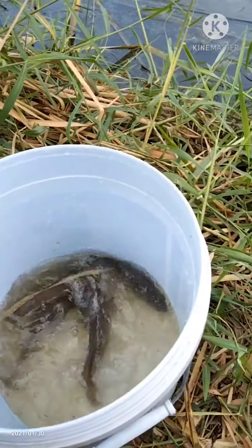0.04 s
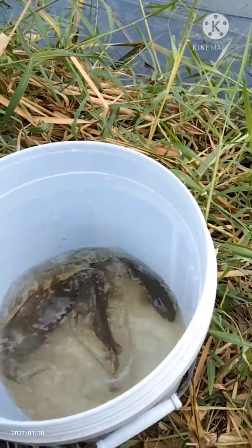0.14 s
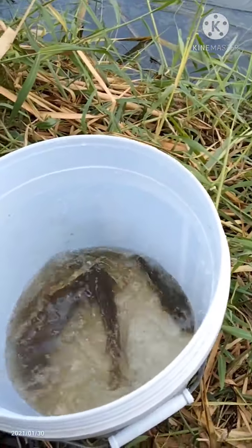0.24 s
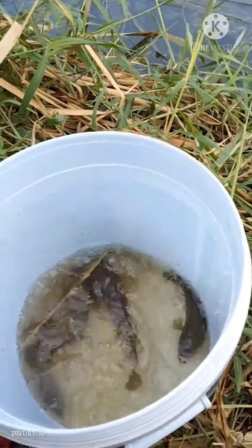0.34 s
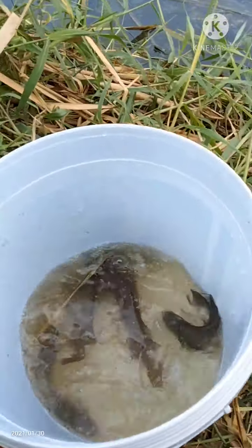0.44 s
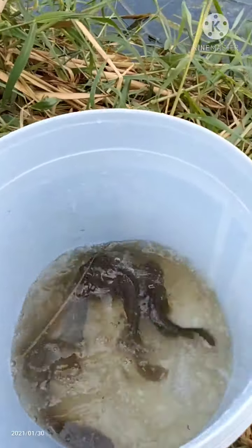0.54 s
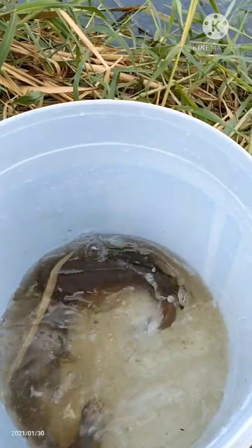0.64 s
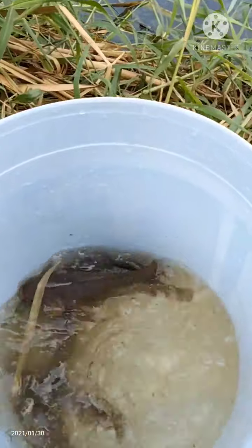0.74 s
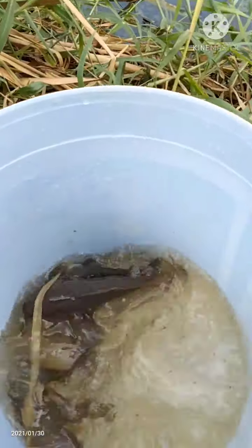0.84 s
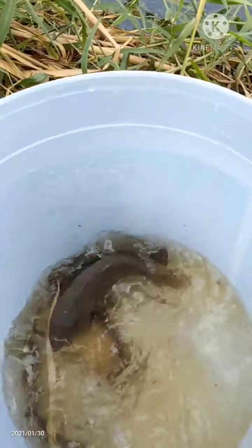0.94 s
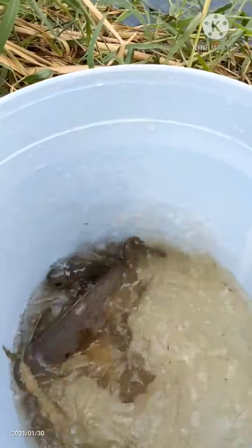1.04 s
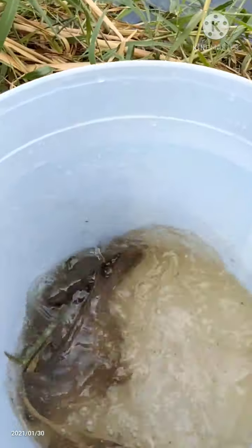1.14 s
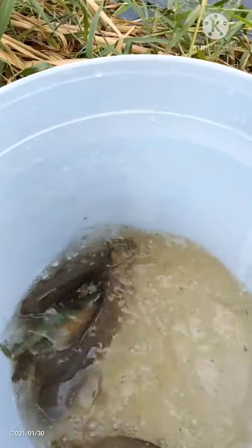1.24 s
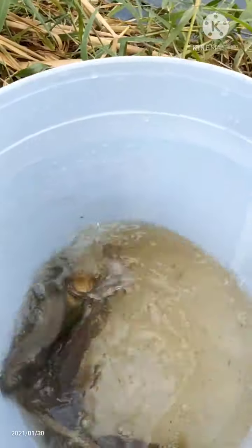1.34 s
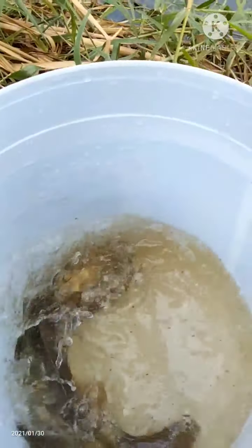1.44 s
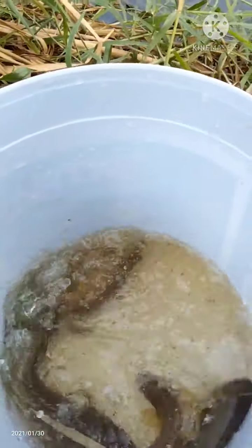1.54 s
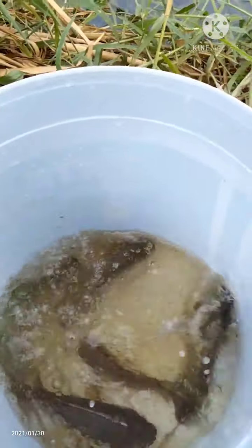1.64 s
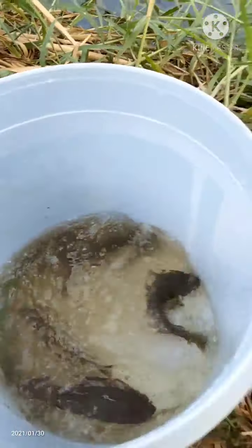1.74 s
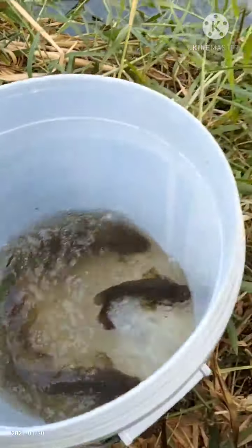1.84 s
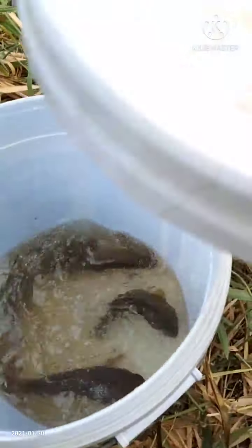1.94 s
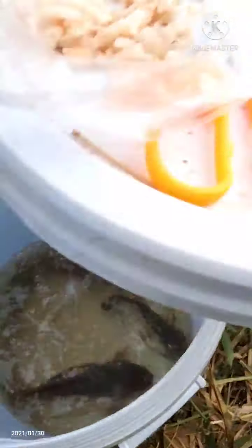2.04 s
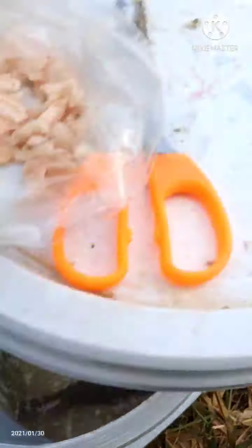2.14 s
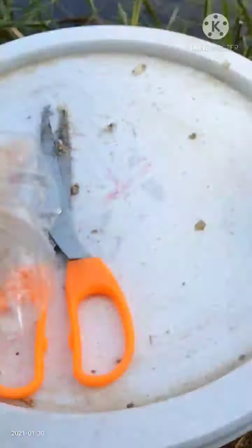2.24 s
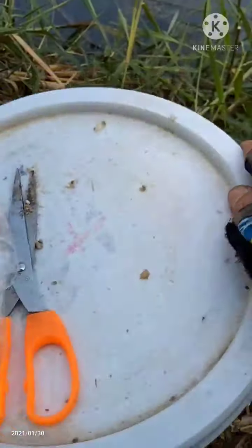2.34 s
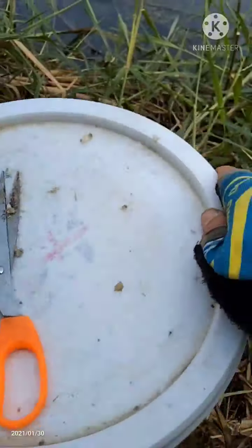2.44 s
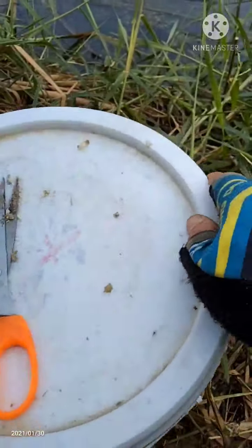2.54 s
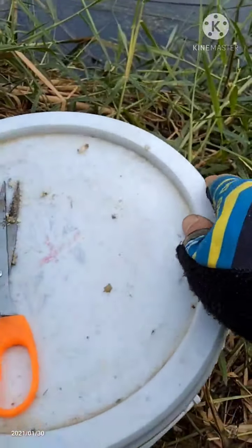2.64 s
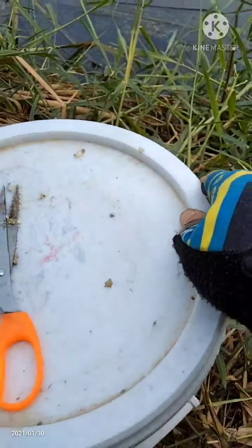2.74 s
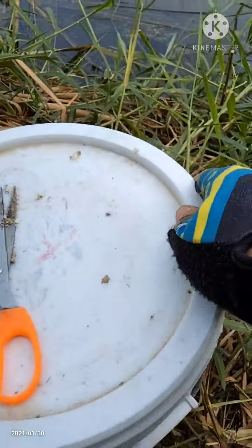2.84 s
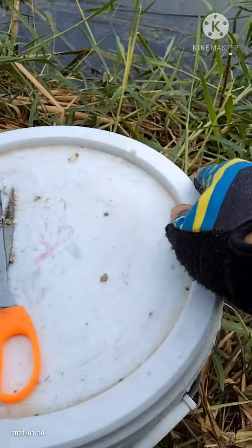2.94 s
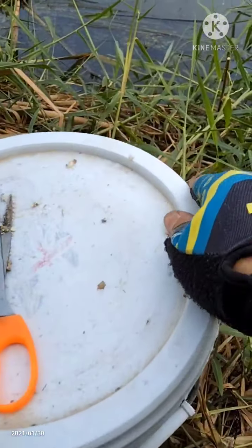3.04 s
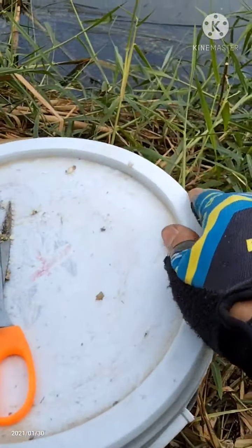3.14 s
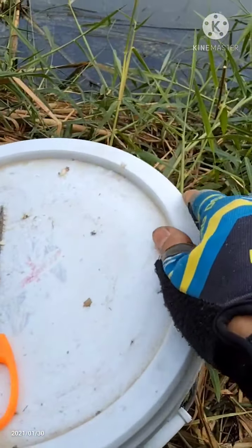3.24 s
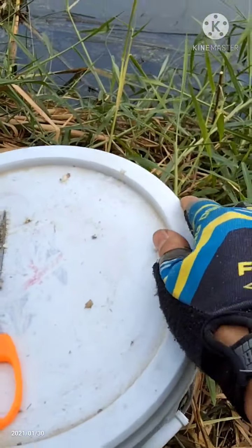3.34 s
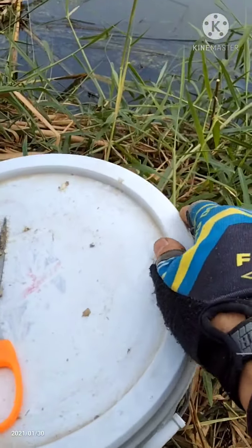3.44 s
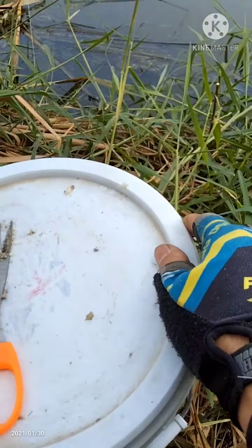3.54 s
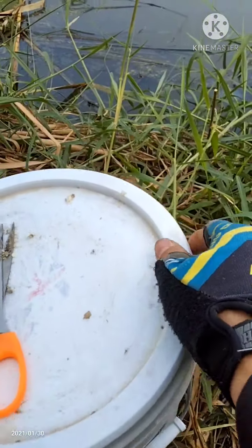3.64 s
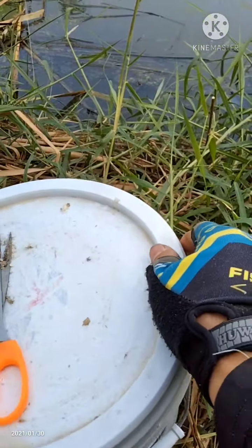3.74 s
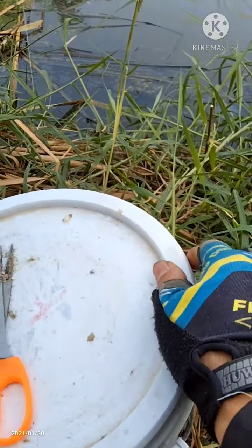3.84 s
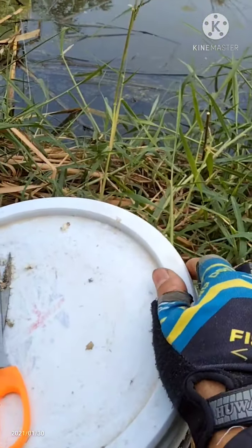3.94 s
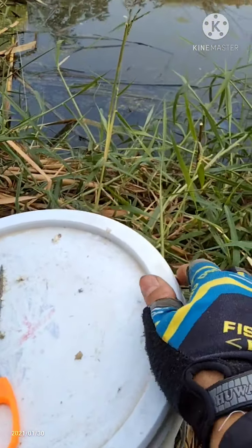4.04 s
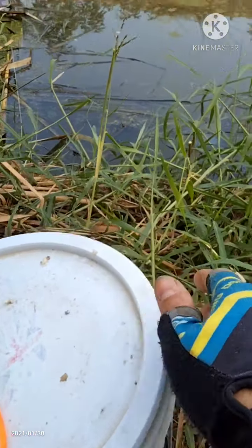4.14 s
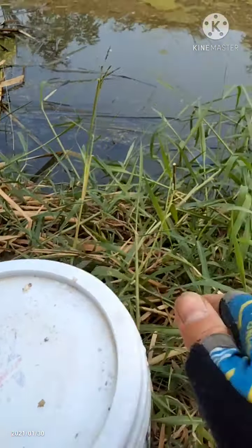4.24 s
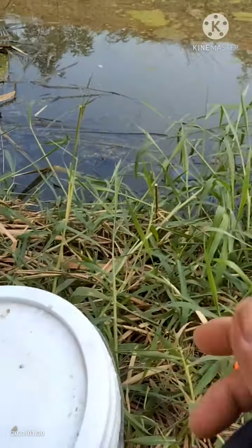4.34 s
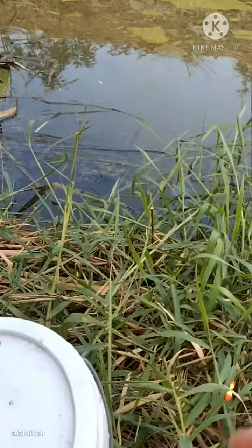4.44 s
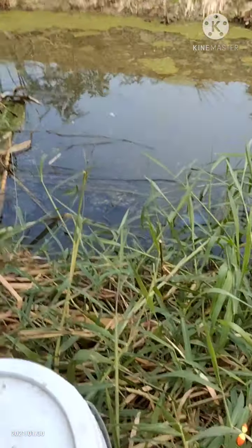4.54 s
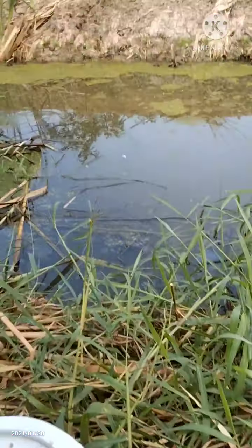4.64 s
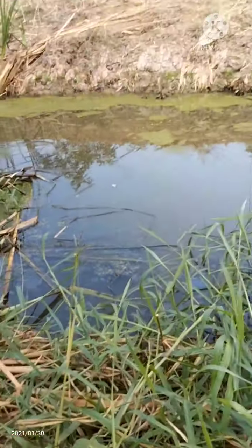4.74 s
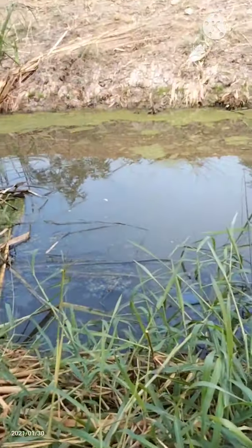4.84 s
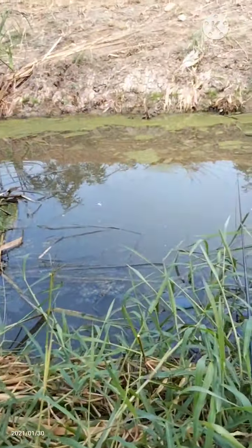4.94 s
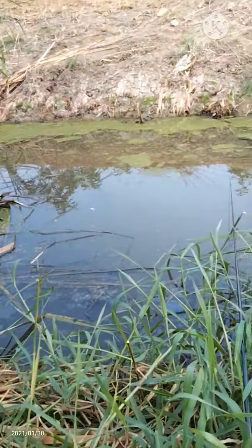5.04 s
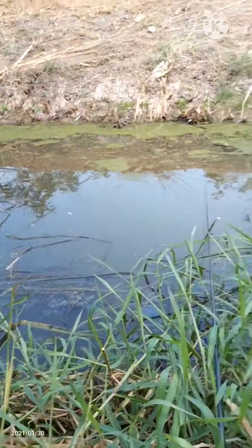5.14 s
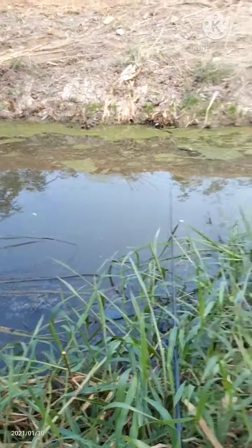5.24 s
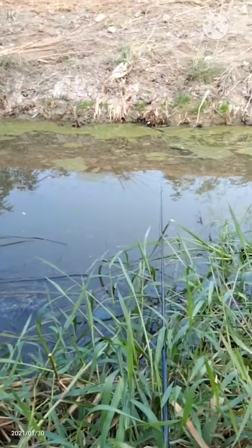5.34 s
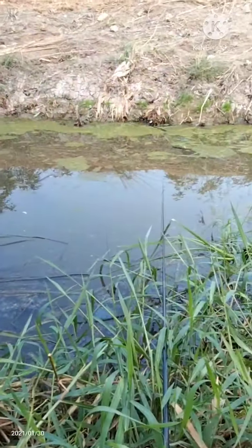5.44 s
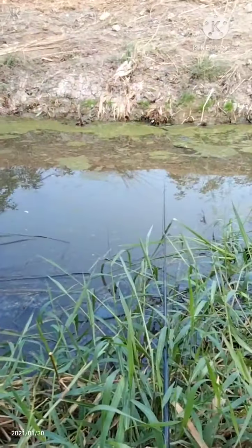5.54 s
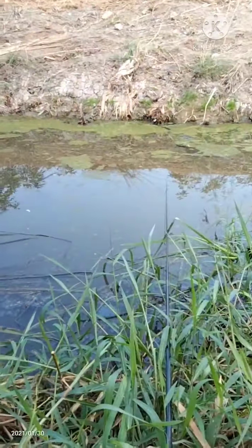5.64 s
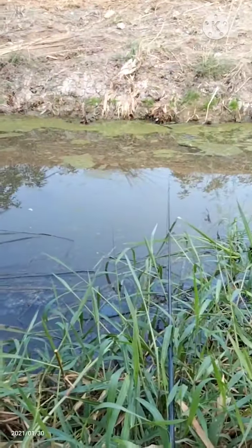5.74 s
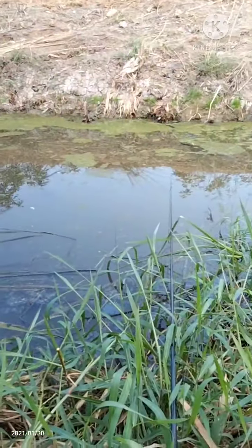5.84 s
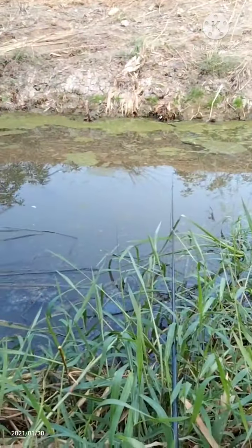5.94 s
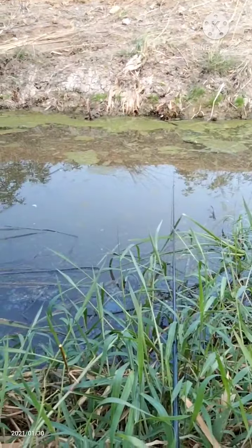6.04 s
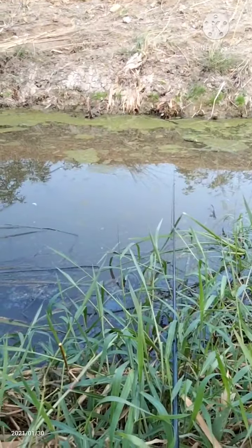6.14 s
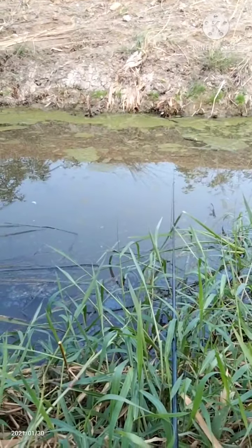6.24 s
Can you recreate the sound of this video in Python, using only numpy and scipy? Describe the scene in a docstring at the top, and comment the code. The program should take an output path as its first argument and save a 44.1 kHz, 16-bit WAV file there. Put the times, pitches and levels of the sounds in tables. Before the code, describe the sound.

A close outdoor stereo scene. From 0 s, gritty, bright cloth rustle sits near the right side over faint lapping, with light splashes at 0.2 and 0.4 s. At 0.6 s a hard wet tail slap cracks out, followed by bubbly plops and droplets to about 0.8 s; small crisp ticks and weaker splashes follow around 1.0 to 1.2 s. A denser flurry of slaps, sloshing and gurgling fills 1.33 to 1.6 s, the open plastic bucket resonating hollowly, then subsides. At 2.4 to 2.6 s a plastic lid lands in loud, low clattering knocks with rim rattle and scraping. Softer thumps and pushes continue from 2.7 to 3.9 s, strongest near 3.65. A firm cloth rub and grass swishes come around 4.7 to 5.2 s, with a dull tap at 5.24. Rustling fades to sparse ticks, faint drips, light breeze and slightly rising distant murmur by 6.3 s.

```python
"""Cloth rustles close to the right port as small fish thrash in shallow water in a plastic bucket outdoors.
A lid then drops on, knocks, scrapes and is pressed home by a hand; ticks, grass and a far murmur go on.
Water is damped bubble sines and clumpy noise; the bucket and the lid are resonances driven by noise and blows.
Cloth, grass and air are shaped noise; two ports listen, and the right one rings in the treble."""
import sys
import numpy as np
from scipy import signal
from scipy.fft import rfft, irfft, next_fast_len
from scipy.io import wavfile
from scipy.ndimage import uniform_filter1d, map_coordinates

SR = 44100
rng = np.random.default_rng(int(sys.argv[2]) if len(sys.argv) > 2 else 0)


def dump(signal):
    """Clip the signal to [-1, 1] and save it as 16-bit WAV at the path in sys.argv[1]."""
    limited = np.clip(np.atleast_2d(signal).T, -1, 1)
    pcm = np.round(limited * 32767).astype(np.int16)
    wavfile.write(sys.argv[1], SR, pcm)


N = 277384
COVERED_S = 2  # the open water's bubbles and faint lapping last until here


def amp(db):
    """Decibels to gain."""
    return 10 ** (np.asarray(db) / 20)


def unit(x):
    """Scaled to rms 1."""
    return x / np.sqrt(np.mean(x ** 2) + 1e-20)


def gains(rows):
    """One gain per sample for each dB column, silent outside the table."""
    s, *columns = np.transpose(rows)
    t = np.arange(N) / SR
    inside = abs(t - np.clip(t, s[0], s[-1])) < .02
    return [amp(np.interp(t, s, column)) * inside for column in columns]


def wobble(rate_hz):
    """Smooth random curve with rate_hz knots a second."""
    knots = rng.standard_normal(int(N * rate_hz / SR) + 4)
    return map_coordinates(knots, [np.arange(N) * rate_hz / SR])


def filtered(x, response):
    """x times a complex response of frequency."""
    m = next_fast_len(N + SR // 2)
    return irfft(rfft(x, m) * response(np.fft.rfftfreq(m, 1 / SR)), m)[..., :N]


def low_cut(corner_hz):
    """Second-order high-pass response: small sources radiate no deep bass."""
    return lambda hz: (1j * hz / (corner_hz + 1j * hz)) ** 2


def points(table):
    """Gain of (Hz, dB) points joined on a log axis."""
    point_hz, db = np.transpose(table)
    return lambda hz: amp(np.interp(np.log(hz + 1), np.log(point_hz), db))


def modes(table):
    """Causal sum of (Hz, width Hz, dB) resonances of alternating sign."""
    def response(f):
        total = 0
        for k, (center, width, db) in enumerate(table):
            total = total + (-1) ** k * amp(db) * 1j * f * width / (center * center - f * f + 1j * f * width)
        return total
    return response


def noise(response, alike_hz, patchy_db=0):
    """Patchy stereo noise of rms 1, shared by the ports well below alike_hz and unrelated well above."""
    z = signal.stft(rng.standard_normal((2, N)), nperseg=256)[2]
    field = uniform_filter1d(rng.standard_normal(z.shape[1:]), size=4, axis=0)
    field = uniform_filter1d(field, size=7, axis=1)
    pair = signal.istft(z * amp(patchy_db * unit(field)), nperseg=256)[1][:, :N]

    def mid_side(hz):
        turn = np.arccos(1 / (1 + (hz / alike_hz) ** 2)) / 2
        return response(hz) * [np.cos(turn), np.sin(turn)]
    mid, side = filtered(pair, mid_side)
    return unit(np.array([mid + side, mid - side]))


def bubbles(s, hz, t60_s, db, pan_db, rise, order=1):
    """Damped sines of rising pitch, held longer at higher order; each has its own level and lag per port."""
    t = np.arange(2200) / SR
    u = t / t60_s[:, None]
    swell = 1 - np.exp(-t * hz[:, None] / 1.6)  # the neck closes over a cycle or two
    tone = np.sin(2 * np.pi * hz[:, None] * t * (1 + rise * u))
    wave = amp(db[:, None] - 60 * u ** order) * swell * tone
    lag = rng.integers(-14, 14, len(s))  # samples between the ports
    pad = 20  # samples of room for early arrivals
    ports = []
    for side in (1, -1):
        first = np.round(s * SR).astype(int)[:, None] + pad + side * lag[:, None] // 2
        at = first + np.arange(len(t))
        heard = wave * amp(side * pan_db[:, None] / 2)
        ports.append(np.bincount(at.ravel(), heard.ravel(), N + SR)[pad:N + pad])
    return np.array(ports)


def bursts(s, db, pan_db, t60_s, attack_s):
    """Stereo envelope of sudden rises that die away; positive pan is left."""
    env, t = np.zeros((2, N + SR)), np.arange(SR // 5) / SR
    for at, level, pan, life in zip(s, db, pan_db, t60_s):
        shape = amp(level - 60 * t / max(life, .002)) * (1 - np.exp(-t / attack_s))
        env[:, round(at * SR):][:, :len(t)] += amp([[pan / 2], [-pan / 2]]) * shape
    return env[:, :N]


def gestures(s, length_s, db, rise_db_per_s, fall_db_per_s):
    """Gain of movements that swell to their level, hold it and fade, at steady dB a second."""
    t = np.arange(0, N + 64, 64) / SR
    early = np.maximum(s[:, None] - t, 0)
    late = np.maximum(t - (s + np.abs(length_s))[:, None], 0)
    each = amp(db[:, None] - abs(rise_db_per_s) * early - abs(fall_db_per_s) * late)
    return np.interp(np.arange(N) / SR, t, np.sqrt((each ** 2).sum(axis=0)))


def fish():
    """Churning bouts and tail slaps, each with an air pocket and droplets; the bucket's air answers."""
    # Tail slaps: start_s, level_db, bubble_hz, pan_db (+ left), bubble_rel_db
    slaps = [(0.218, -30, 2000, -8, -10), (0.377, -19, 1830, 4, -10), (0.608, -5, 2510, 4.5, -14),
             (0.618, -23, 1466, -2, 2), (0.632, -40, 1340, 7, 12), (0.706, -19, 2450, -5, -7),
             (0.735, -15, 1990, -1.5, 0), (0.77, -33, 890, -0.5, 8), (1.028, -24.5, 1120, 1.5, -12),
             (1.047, -37.5, 1340, 0, 14.5), (1.16, -22, 1540, -12.5, -6), (1.352, -13, 1670, 0, -9),
             (1.366, -12, 947, 12.5, -8.5), (1.383, -16.5, 553, 14, -17), (1.421, -9.5, 1790, 9, -2),
             (1.46, -9.5, 1415, 1, -5.5), (1.486, -37, 2700, -15, 13), (1.521, -16, 1870, 1, -5),
             (1.587, -38, 1380, -10, 4), (1.636, -33.5, 920, -3, 9), (1.765, -26.5, 2400, -11, -6),
             (1.794, -44, 838, 1, 5), (1.941, -27.5, 2740, -5.5, 0)]
    # Thrashing bouts: start_s, length_s, slosh_db, boom_db
    bouts = [(0.089, 0.08, -47.5, -51.5), (0.542, 0.05, -40, -58), (0.597, 0.018, -35, -45),
             (0.671, 0.035, -32.5, -57.5), (0.737, 0.045, -38.5, -39), (0.867, 0.27, -46.5, -60),
             (1.327, 0.0057, -41.5, -43), (1.376, 0.11, -23.5, -48), (1.518, 0.012, -26.5, -47),
             (1.583, 0.071, -40, -61), (1.745, 0.092, -40, -49.5)]
    # Air in the open bucket: center_hz, width_hz, level_db
    open_bucket = [(329, 23.6, -1.5), (171.4, 13.6, -8.5)]
    drops_count, drop_within_s, drop_cycles, drop_db = 10, 0.037, 29, -7  # cycles to fade 60 dB
    drop_spread, drop_below = 2.5, 0.285  # highest/lowest pitch; log share below the pocket's pitch
    wall_db = 26  # how hard a slap jolts the bucket's air
    still_db = -73.5

    start, length, slosh_db, boom_db = np.transpose(bouts)
    lapping = amp(still_db) * (np.arange(N) < COVERED_S * SR)
    slosh = gestures(start, length, slosh_db, rise_db_per_s=900, fall_db_per_s=187) + lapping
    boom = gestures(start, length, boom_db, rise_db_per_s=2498, fall_db_per_s=300) + lapping
    air = unit(amp(4.5 * wobble(30)) * noise(modes(open_bucket), alike_hz=712))

    s, db, hz, pan, bubble_db = np.transpose(slaps)
    surge = amp(2.7 * wobble(70)) * slosh
    surge = surge + bursts(s, db - 5.5, pan, 0.058 + 0 * s, attack_s=0.0022)
    pocket = bubbles(s + 0.00184, hz, 40 / hz, db + bubble_db - 3.5, pan, rise=0.034, order=2)
    pocket *= amp(1.8 * wobble(150))  # the surface around the pocket keeps moving

    late, spread = rng.random((len(s), drops_count, 2)).T
    drop_s = (s + drop_within_s * late).ravel()
    drop_hz = (hz * drop_spread ** (spread - drop_below)).ravel()
    drop_level_db = (db + drop_db - 20 * late).ravel()  # later droplets are weaker
    drop_pan_db = np.tile(pan, drops_count)
    drops = bubbles(drop_s, drop_hz, drop_cycles / drop_hz, drop_level_db, drop_pan_db, rise=0.16)

    blows = np.bincount(np.round(s * SR).astype(int), amp(db + wall_db), N)
    jolts = filtered(blows, modes(open_bucket))
    whole = surge * water() + pocket + drops + jolts + amp([[1.5], [-1.5]]) * boom * air
    return filtered(whole, low_cut(120))


def water(count=2600):
    """Grain of broken water: a cloud of small bubbles, a few of them strong, over clumpy noise."""
    # Splash spectrum: freq_hz, density_db (relative, per Hz)
    splash = [(300, -11.5), (600, -6), (900, -22.5), (1900, -1), (3300, -0.5), (5500, -12.5), (9000, -12.5),
              (15000, -15)]
    cloud_db, spread_db = -9, 12  # spread: pan range from far right to far left
    when, pitch, life, size, side = rng.random((count, 5)).T
    hz = 700 * 8 ** pitch
    size_db = -3 * np.log(1 - size)
    level_db = size_db - 11 * abs(pitch - .45)
    cloud = bubbles(when * COVERED_S, hz, (14 + 40 * life) / hz, level_db, spread_db * (side - .5), rise=0.17)
    cloud /= np.sqrt(np.mean(cloud[:, :round(COVERED_S * SR)] ** 2))
    wash = unit(amp(2.1 * wobble(250)) * noise(points(splash), alike_hz=899, patchy_db=5.5))
    return amp(cloud_db) * cloud + amp([[-6.5], [-11.5]]) * wash


def plops():
    """Lone bubbles and drips ring as damped sines; a few chirp steeply upward on reaching the surface."""
    # Lone bubbles: start_s, level_db, pitch_hz
    lone = [(0.667, -31.5, 4030), (0.684, -28.5, 3010), (0.732, -28, 2840), (0.742, -31, 1630),
            (0.887, -37.5, 1440), (0.978, -43, 1080), (1.137, -40, 1165), (2.139, -44, 3140),
            (2.798, -40, 1920), (2.803, -38.5, 2190), (2.866, -41.5, 1460), (6.145, -55.5, 815),
            (6.214, -51, 573)]
    # Rising bubbles: start_s, level_db, starting_hz
    rising = [(0.602, -22, 1377), (0.816, -32.5, 1410), (1.338, -26.5, 1660)]
    s, db, hz = np.transpose(lone)
    steady = bubbles(s, hz, 55 / hz, db, 0 * s, rise=0.033, order=2)
    s, db, hz = np.transpose(rising)
    chirps = bubbles(s, hz, 0.03 + 0 * s, db, 0 * s, rise=0.64, order=2)
    return (steady + chirps) * amp(3 * wobble(300))  # the water around each keeps moving


def smacks():
    """Tail on water, lid on rim, stalk on stalk: a sudden pull of air that rings for a cycle or two."""
    # Dull smacks: start_s, level_db, pan_db (+ left), ring_hz
    hits = [(0.6115, -8, -10.5, 2400), (0.6148, -14.5, 2.5, 4200), (1.1644, -32, -3, 2640),
            (1.3692, -5, 4, 2550), (1.4249, -13, 11.5, 1006), (1.4598, -8.5, -1.5, 2500),
            (2.428, -13.5, 18, 1540), (2.4332, -14, 23, 865), (2.558, -15, 5, 665), (2.575, -17, 6.5, 1190),
            (2.748, -40, -1, 700), (2.7491, -19, -11, 4500), (3.259, -23, 8, 544), (3.492, -19, 2, 480),
            (3.6603, -11, 3.5, 833), (3.879, -31.5, -1, 690), (5.237, -21, 12, 1720)]
    fade_cycles = 3.9  # to fall 60 dB
    s, db, pan, hz = np.transpose(hits)
    samples = np.arange(900)
    turns = samples / SR * hz[:, None]
    decay = amp(db[:, None] - 60 * turns / fade_cycles)
    wave = -decay * (1 - np.exp(-turns / .08)) * np.sin(2 * np.pi * turns)
    at = (np.round(s * SR).astype(int)[:, None] + samples).ravel()
    push = [np.bincount(at, (wave * amp(side * pan[:, None] / 2)).ravel(), N) for side in (1, -1)]
    return filtered(np.array(push), low_cut(150))


def lid():
    """Contacts drum the lid and trapped air and shake the rim; a leaning hand makes it rumble and scrape."""
    # Lid contacts: start_s, level_db, drum_hz, rim_rel_db
    knocks = [(2.315, -37.5, 305, -2), (2.389, -15, 292, -3.5), (2.401, -5, 270, -12.5),
              (2.43, -6, 307, -9.5), (2.444, -12, 246, -36), (2.468, -23, 288, 1), (2.558, -6, 287, -5),
              (2.575, -4, 169, -10), (2.638, -32.5, 172, 0.5), (2.73, -20, 185, -24), (2.746, -20, 184, -7),
              (2.794, -30, 183, -6), (2.878, -23, 167, -40), (3.202, -31, 155, -16), (3.228, -25, 177, -11),
              (3.26, -26, 302, -7), (3.27, -16, 159, -31), (3.372, -18.5, 200, -20.5),
              (3.385, -16.5, 182, -23), (3.493, -21.5, 260, -11), (3.598, -30.5, 318, 3),
              (3.619, -14, 181, -9.5), (3.659, -12.5, 159, -11), (3.876, -27.5, 186, -8),
              (4.255, -34, 160, -9.5)]
    # Hand leaning on the lid: start_s, length_s, drumming_db, scrape_db
    pushes = [(2.414, 0.018, -29.5, -27), (2.467, 0.033, -27.5, -30.5), (2.521, 0.065, -46, -33.5),
              (2.566, 0.015, -22.5, -27), (2.618, 0.099, -57, -49), (2.714, 0.07, -40, -47.5),
              (2.748, 0.05, -38.5, -44), (2.79, 0.047, -39, -47), (2.863, 0.016, -47, -44),
              (2.916, 0.043, -61, -45), (2.984, 0.014, -50, -44.5), (3.189, 0.073, -38, -45.5),
              (3.247, 0.045, -32.5, -62), (3.373, 0.032, -31, -46.5), (3.491, 0.022, -31.5, -53),
              (3.591, 0.054, -29, -38), (3.662, 0.027, -28, -39.5), (3.878, 0.063, -48, -54)]
    # Rim resonances: center_hz, width_hz, level_db
    rim_modes = [(592, 52, -4.5), (861, 49, 2), (933, 36, -0.5), (1310, 200, -16.5), (2100, 320, -14.5),
                 (2830, 220, -16.5)]
    # Lid and trapped air: center_hz, width_hz, level_db
    closed_bucket = [(151, 26.4, -1), (261, 81, -5.5), (337, 91, -8.5), (470, 151, -15)]
    # Scrape spectrum: freq_hz, density_db (relative, per Hz)
    scrape_band = [(350, 8.5), (600, -19), (860, 8.5), (1300, -0.5), (2200, -2), (3500, -3.5), (6000, -16),
                   (15000, -29.5)]
    # Port balance: freq_hz, left_db (the right gets the opposite)
    lid_side = [(150, -1.5), (500, 0.5), (3000, -2.5)]
    rattle_db = 3  # how unevenly the rim catches as it slides
    lag_s = 0.0002  # the left port is farther from the lid

    start, length, drum_db, scrape_db = np.transpose(pushes)
    drumming = gestures(start, length, drum_db, rise_db_per_s=1392, fall_db_per_s=431)
    scraping = gestures(start, length, scrape_db, rise_db_per_s=1392, fall_db_per_s=431)

    drum, t = np.zeros(N + SR), np.arange(SR // 4) / SR
    for s, db, hz, _ in knocks:
        decay = amp(db - 60 * t * hz / 14)  # 60 dB in 14 cycles
        thud = decay * (1 - np.exp(-t / 0.0013)) * np.sin(2 * np.pi * hz * t)
        drum[round(s * SR):][:len(t)] += thud

    s, db, _, rim_db = np.transpose(knocks)
    catches = unit(amp(rattle_db * wobble(220)))
    grit = noise(points([(200, 5), (800, -4.5), (4000, -3.5), (9000, -32.0)]), alike_hz=2510)
    chatter = bursts(s, db + rim_db + 9.5, 0 * s, 0.061 + 0 * s, attack_s=0.000083)
    chatter = chatter + amp(2) * scraping * catches
    rim = filtered(chatter * grit, modes(rim_modes))  # rough contact keeps feeding the same few modes

    crack_band = points([(700, 12.0), (2000, 10.5), (6000, -3.0), (15500, -30.0)])
    crack = bursts(s, db + rim_db - 13, -3 + 0 * s, 0.028 + 0 * s, attack_s=0.00042)
    crack = crack * noise(crack_band, alike_hz=695)

    rumble = unit(amp(5.1 * wobble(40)) * noise(modes(closed_bucket), alike_hz=878))
    scrape = noise(points(scrape_band), alike_hz=770, patchy_db=2.2)
    scrape = unit(catches * amp(2.8 * wobble(70)) * scrape)
    whole = drum[:N] + rim + crack + drumming * rumble + scraping * scrape

    def to_ports(hz):
        half_path = points(lid_side)(hz) * np.exp(-1j * np.pi * hz * lag_s)
        return low_cut(110)(hz) * half_path ** np.array([[1], [-1]])
    return filtered(whole, to_ports)


def ticks():
    """Droplets, fibres and stalks snap: brief bright noise, and a duller body returned separately."""
    # Sharp ticks: start_s, level_db, pan_db (+ left), body_rel_db
    snaps = [(0.363, -33, -19, -35), (0.379, -14, -13.5, -4), (0.801, -13, -12, -38),
             (0.845, -15.5, -12.5, -13), (1.028, -9.5, -12.5, -15), (1.0342, -10.5, 0.5, -3),
             (1.207, -24, -16, -17), (1.3572, -9, -1.5, -8), (1.466, -8.5, -12, -6),
             (1.5817, -10.5, -13.5, -36), (2.365, -27, -31, -37), (2.4807, -23.5, -15, -19),
             (2.5573, -16.5, -15, -20), (3.66, -23, -16, 3), (4.6066, -31, -26.5, -23),
             (4.953, -33, -26, -30), (5.0818, -27, -24, -5), (5.3955, -40.5, -25, -16),
             (6.093, -40.5, -20, -15.5), (6.1967, -41, -9, -6.5)]
    s, db, pan, body_db = np.transpose(snaps)
    bright_band = points([(1500, -33.5), (3000, -29.0), (6000, -4.5), (16800, -2.5)])
    bright = bursts(s, db - 8.0, pan + 8, 0.016 + 0 * s, attack_s=0.00082)
    bright = bright * noise(bright_band, alike_hz=3000)
    body_band = points([(300, -33.0), (1500, -7.5), (3500, -6.5), (6000, -21.0), (9000, -47.0)])
    body = bursts(s, db + body_db - 9.5, pan / 0.79, 0.013 + 0 * s, attack_s=0.000087)
    body = body * noise(body_band, alike_hz=3020)
    return bright, body


def rustle():
    """Cloth fibres slip beside the right port, barely reaching the left: gritty, patchy noise."""
    # Continuous rubbing that swells and fades: time_s, level_db
    rubbing = [(0.0, -45.5), (0.35, -43), (0.66, -31.5), (0.94, -39.5), (1.19, -44.5), (1.4, -57),
               (1.54, -40), (2.04, -47.5), (2.48, -45.5), (2.73, -46), (3.95, -50.5), (4.13, -44.5),
               (4.6, -44.5), (5.49, -52.5), (5.93, -66), (6.28, -69)]
    # Firmer rubs: start_s, length_s, level_db
    rubs = [(0.102, 0.025, -33.5), (1.42, 0.13, -45), (2.237, 0.075, -44.5), (2.568, 0.022, -37.5),
            (2.957, 0.042, -40), (4.754, 0.043, -30.5), (5.23, 0.12, -48.5), (5.808, 0.014, -52.5)]
    # Cloth spectrum: freq_hz, density_db (relative, per Hz)
    cloth = [(1500, -6.5), (4000, -5), (7000, -8.5), (11000, -5.5), (15500, 3)]
    grit = amp(2.85 * wobble(25) + 0.56 * wobble(500))
    shadow = amp([[-20], [0]])
    firm = gestures(*np.transpose(rubs), rise_db_per_s=175, fall_db_per_s=405)
    motion = np.hypot(gains(rubbing)[0], firm)
    return motion * shadow * unit(grit * noise(points(cloth), alike_hz=583, patchy_db=3.5))


def grass():
    """Blades brush past nearer the left port: short swells of patchy noise."""
    # Swishes: start_s, length_s, level_db
    swishes = [(4.672, 0.079, -52), (4.767, 0.03, -47), (4.894, 0.047, -46), (5.2, 0.11, -49)]
    # Grass spectrum: freq_hz, density_db (relative, per Hz)
    blades = [(100, -42), (300, 10), (1000, 7), (2500, 7.5), (5000, 4), (8000, -5.5), (14000, -1),
              (15500, -27)]
    grit = amp(0.52 * wobble(570))
    motion = gestures(*np.transpose(swishes), rise_db_per_s=698, fall_db_per_s=601)
    return motion * amp([[3], [-5]]) * unit(grit * noise(points(blades), alike_hz=500, patchy_db=5.5))


def countryside():
    """A soft, shifting murmur of distance and a light breeze on the ports, both shaped noise."""
    # Distant murmur: time_s, level_db
    far = [(0, -70.5), (3.8, -70.5), (5.5, -62.5), (6.29, -60.5)]
    # Murmur spectrum: freq_hz, density_db (relative, per Hz)
    far_band = [(200, -7), (400, -7), (565, 0.5), (1120, 1.5), (1860, -11), (5000, -25), (15000, -41.5)]
    # Breeze spectrum: freq_hz, density_db (relative, per Hz)
    breeze_band = [(25, -21), (55, -6), (110, -1.5), (200, -1.5), (400, -15), (800, -47)]
    murmur = gains(far)[0] * amp(0.72 * wobble(12.0))
    murmur = murmur * noise(points(far_band), alike_hz=395, patchy_db=2.5)
    breeze = amp(-63.5 + 2.8 * wobble(1.68)) * noise(points(breeze_band), alike_hz=151.0)
    return murmur + breeze


def scene():
    """Sum of all sources; all but the bright ticks drop 40 dB at the very top."""
    dull_hz = 15600
    bright, body = ticks()
    soft = fish() + plops() + smacks() + lid() + body + rustle() + grass() + countryside()
    return filtered(soft, lambda hz: np.where(hz < dull_hz, 1, amp(-40.0))) + bright


def record(dry):
    """The right port's channel resonates in the treble; nothing passes above the band limit."""
    top_hz = 16800
    ring = modes([(9136, 808, 21.04)])  # center_hz, width_hz, level_db
    return filtered(dry, lambda hz: np.array([1 + 0 * hz, 1 + ring(hz)]) * (hz < top_hz))


dry = scene()
out = record(dry)
dump(out)
```